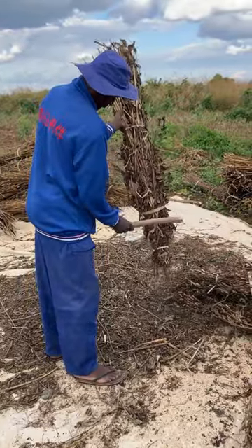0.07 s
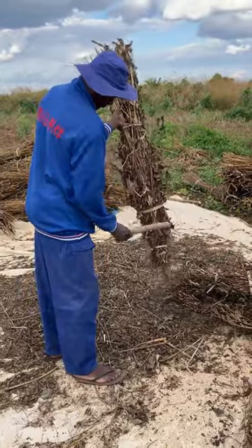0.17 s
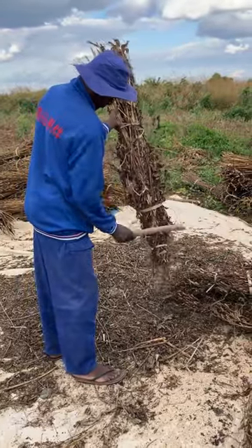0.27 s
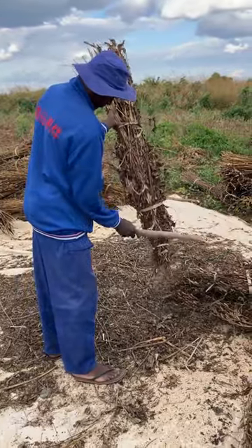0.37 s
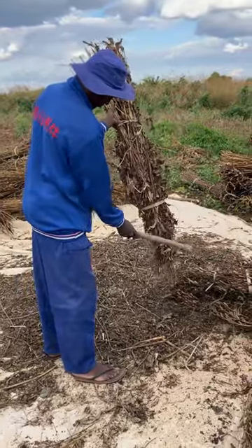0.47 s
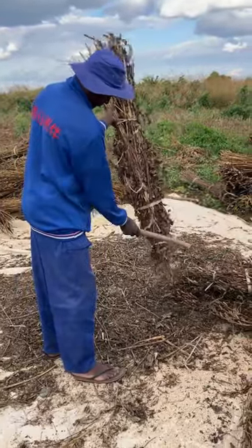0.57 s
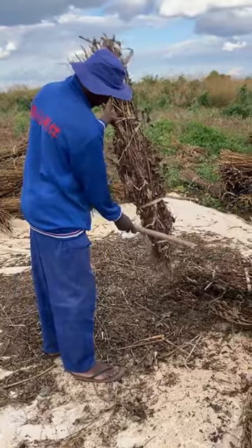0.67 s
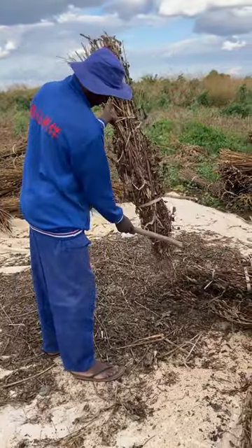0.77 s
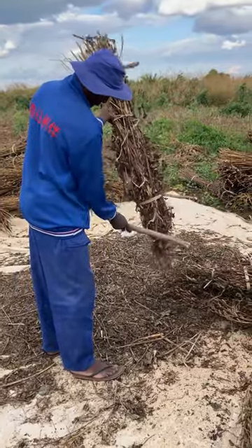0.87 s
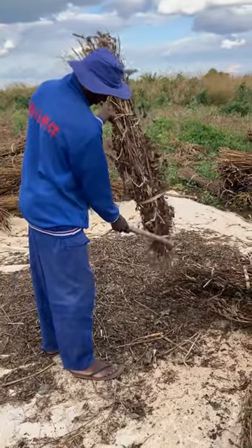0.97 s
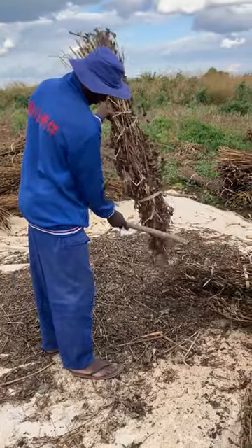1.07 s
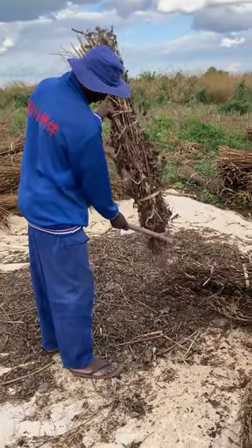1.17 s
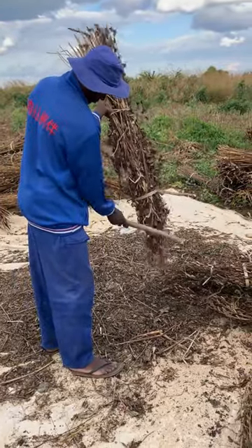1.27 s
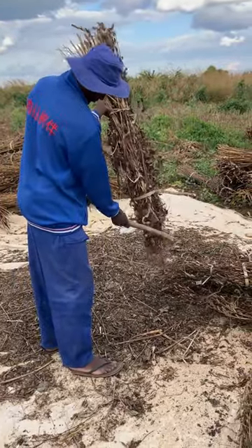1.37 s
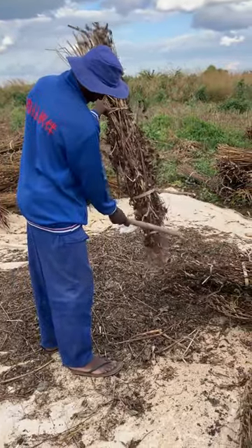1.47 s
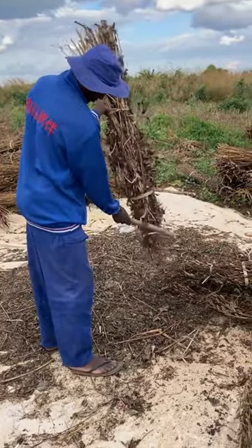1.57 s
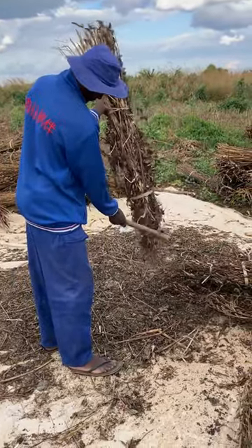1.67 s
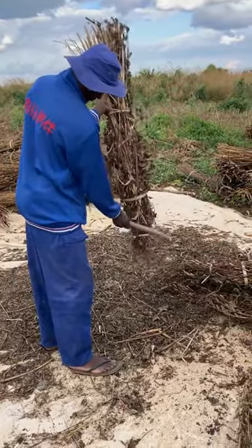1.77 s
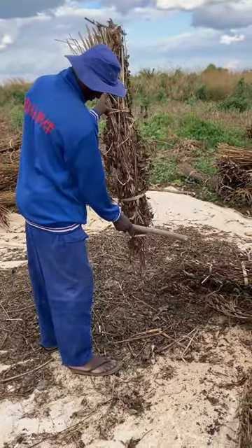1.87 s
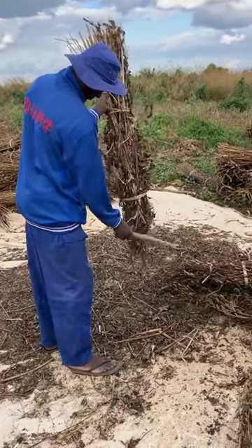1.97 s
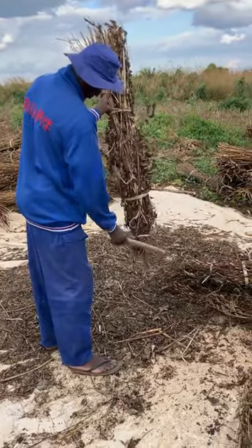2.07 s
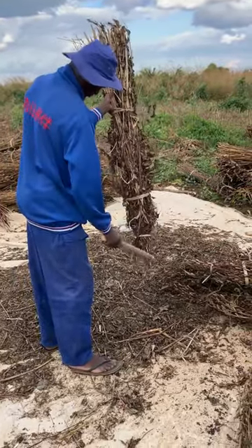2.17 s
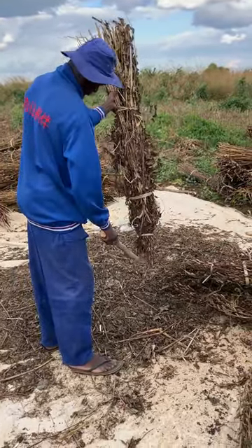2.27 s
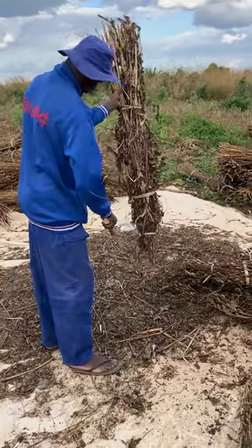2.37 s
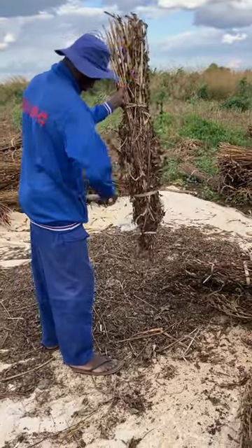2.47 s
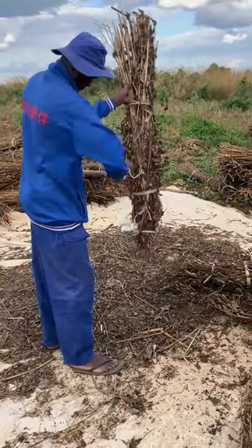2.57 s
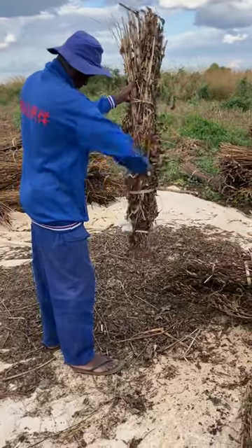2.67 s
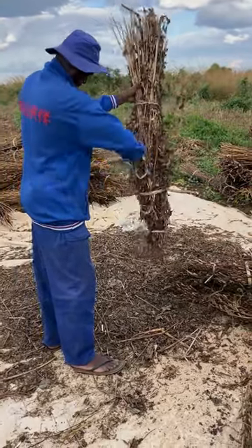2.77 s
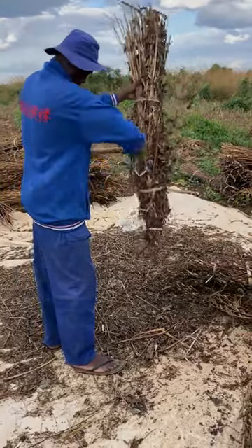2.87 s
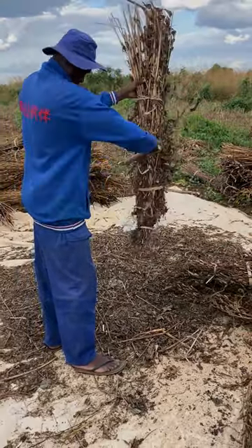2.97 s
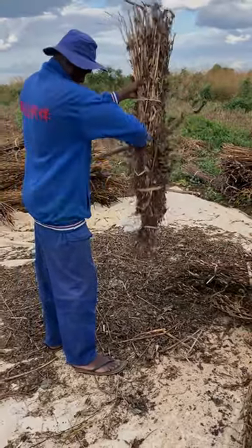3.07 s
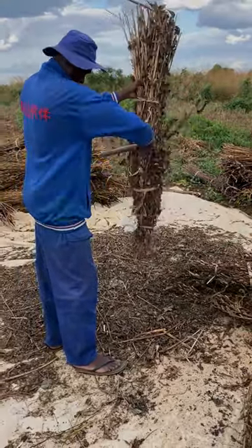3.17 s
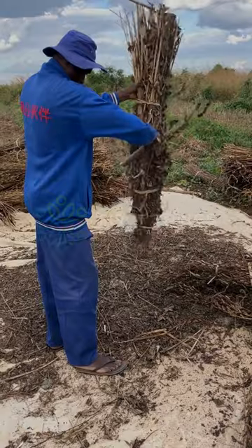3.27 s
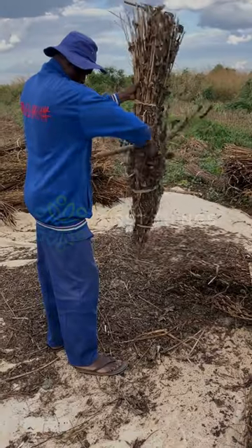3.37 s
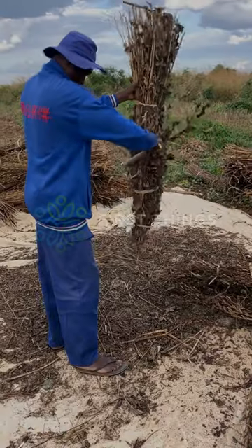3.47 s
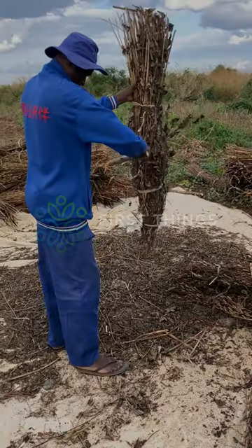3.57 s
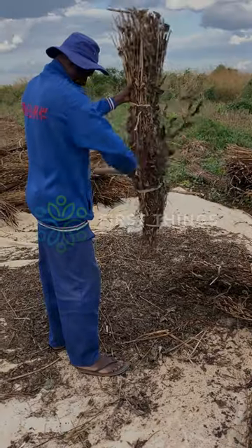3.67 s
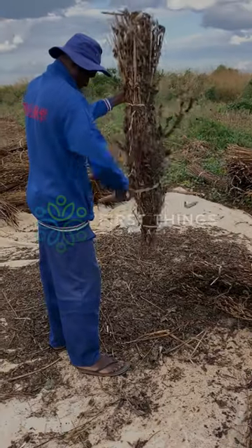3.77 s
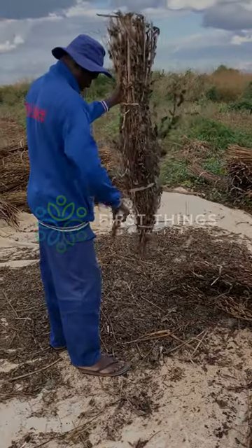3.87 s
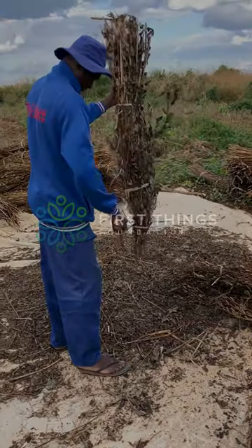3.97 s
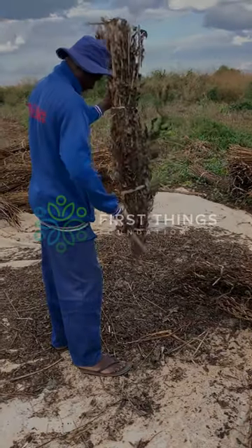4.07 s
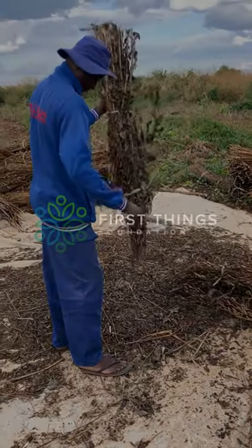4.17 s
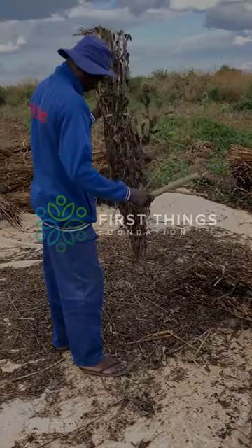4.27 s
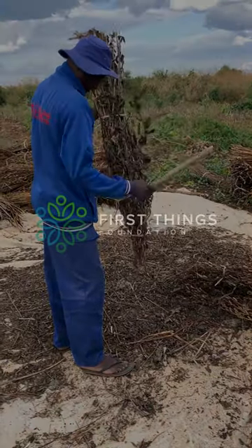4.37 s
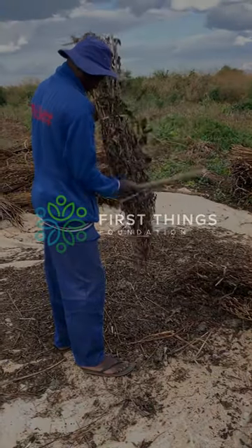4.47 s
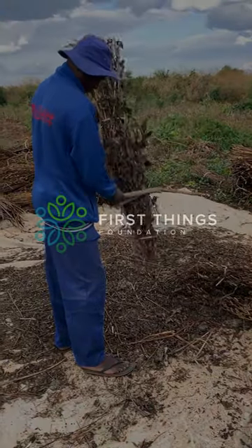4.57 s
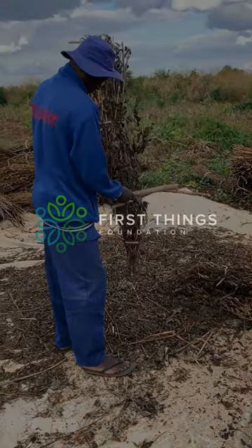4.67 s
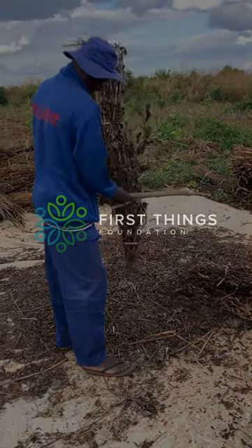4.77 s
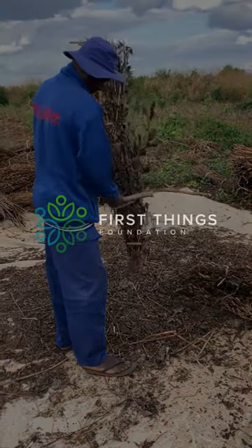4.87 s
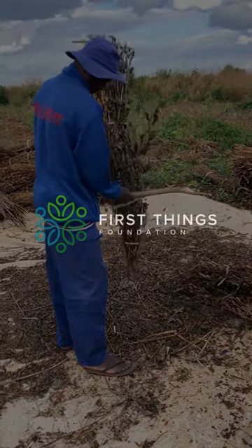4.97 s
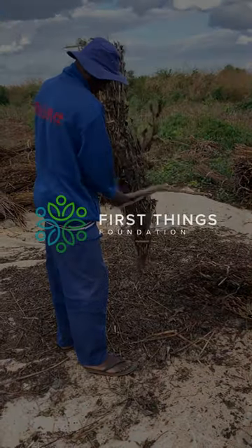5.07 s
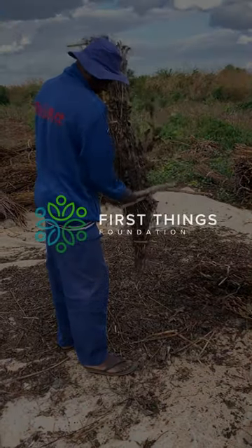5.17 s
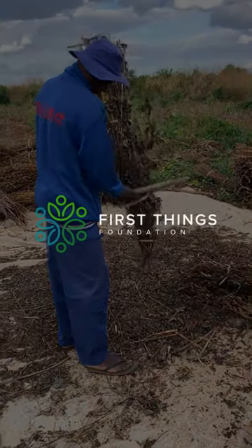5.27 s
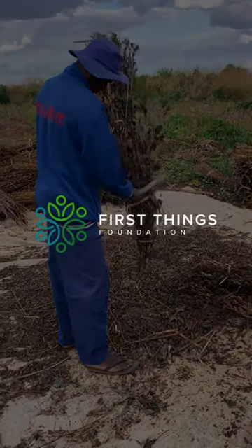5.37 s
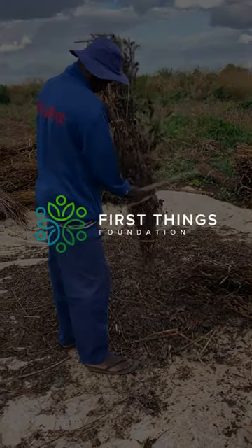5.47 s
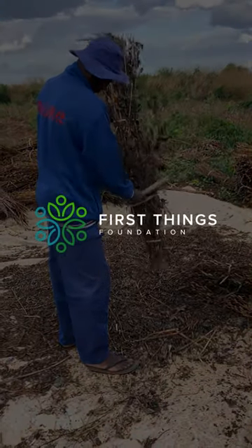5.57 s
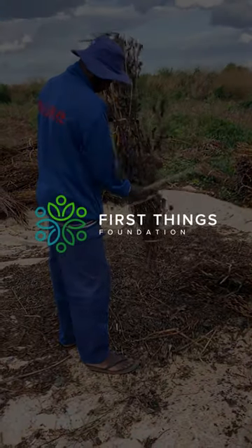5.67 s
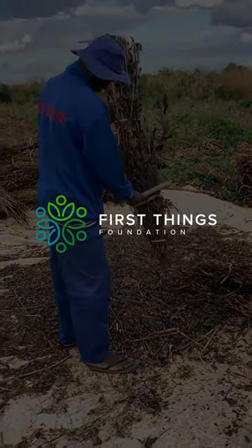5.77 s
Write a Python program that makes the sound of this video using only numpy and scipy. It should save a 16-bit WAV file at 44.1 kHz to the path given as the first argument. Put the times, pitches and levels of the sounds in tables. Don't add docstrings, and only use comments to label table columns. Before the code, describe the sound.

Outdoors, close to a hand-held stereo microphone, chaff and seeds patter finely before a stick beats a dry plant bundle seven times rapidly. Seeds trickle and twigs tick, then four blows with a stronger stalk rattle follow, a sparse pause, and six final blows, gradually softening. Light low wind puffs brush the microphone.

```python
import sys
import numpy as np
from scipy import signal
from scipy.fft import rfft, irfft, next_fast_len
from scipy.io import wavfile
from scipy.ndimage import uniform_filter1d

SR = 44100
rng = np.random.default_rng(int(sys.argv[2]) if len(sys.argv) > 2 else 0)


def natural_amplitude(level_db):
    exponent = np.asarray(level_db, float) / 20
    return 10 ** exponent


def output_pcm(signal):
    pcm = np.clip(np.atleast_2d(signal).T, -1, 1) * 32767
    wavfile.write(sys.argv[1], SR, np.round(pcm).astype(np.int16))


N = 256220

# start_s, peak_db, t60_s
GUSTS = [(.03, -76, 0.44), (.27, -64.5, 0.25), (.47, -74, 1.4), (.73, -65.5, 2.5), (.99, -60, 0.43),
         (1.16, -64, 0.23), (1.34, -81, 0.21), (1.54, -69, 0.17), (1.72, -54, 0.12), (2.01, -47.5, 0.23),
         (2.06, -70, 0.71), (2.26, -55, 0.22), (2.41, -54, 0.16), (2.67, -56.5, 0.43), (2.752, -39, 0.063),
         (2.85, -53, 0.11), (2.96, -73, 0.72), (3.12, -58, .3), (3.23, -61, 0.19), (3.38, -67, 0.19),
         (3.55, -67, 0.23), (3.67, -61.5, 0.24), (3.81, -76, 0.17), (4.45, -80, 0.46), (4.58, -67, 0.37),
         (4.871, -56, 0.17), (5.132, -40, 0.076), (5.36, -58, 0.2), (5.58, -54.5, 0.1), (5.79, -60, 0.26)]
# time_s, level_db
BREEZE = [(0, -80), (1.1, -79), (1.3, -102), (1.9, -94), (2.0, -60), (3.75, -70), (3.9, -89), (4.4, -69.5),
          (5.0, -85), (5.81, -90)]
# freq_hz, density_db
WIND_COLOUR = [(20, 0), (60, 6.5), (110, -2.5), (200, -16.5), (400, -62), (900, -89)]

# time_s, patter_db
SHOWER = [(0.0, -38.5), (0.29, -43), (0.6, -40.5), (1.37, -37.5), (1.86, -42.5), (2.48, -47), (2.68, -46),
          (3.38, -46.5), (3.61, -47), (3.88, -45), (4.27, -51.5), (4.53, -55.5), (5.1, -54.5), (5.81, -51)]
# start_s, peak_db
TICKS = [(0.0474, -27), (0.0714, -28), (0.1464, -27), (0.2164, -27), (0.4034, -26), (2.0438, -28),
         (2.1364, -32), (2.1755, -28), (2.2528, -33), (2.3544, -30), (2.3604, -30), (2.4199, -23),
         (2.5486, -31), (2.6599, -25), (3.8024, -32), (3.8124, -32), (3.8681, -32), (3.906, -28),
         (3.9394, -34), (3.9843, -25), (4.0494, -36), (4.1114, -31), (4.1644, -32), (4.2794, -34),
         (4.3056, -37), (4.3894, -36), (4.4448, -39), (4.4762, -40), (4.4994, -40), (4.5151, -28.5)]
# freq_hz, density_db
PATTER_COLOUR = [(90, -63), (250, -19.5), (560, -29.5), (800, -22), (1200, -17), (3400, -14.5),
                 (5500, -5.5), (9000, -3.5), (11700, 2.5), (15600, -6.5)]
# time_s, share (0-1)
NARROW_FALL = [(0, .1), (1.3, .15), (1.5, .35), (2.4, .3), (2.6, .9), (3.3, .9), (3.7, .7), (3.9, .3),
               (5.81, .5)]
# freq_hz, density_db
CREAK_COLOUR = [(300, -16), (560, -19), (1000, -9.5), (2000, 1), (4000, -9), (6000, -5), (9000, -31)]

# start_s, crash_peak_db, knock_db, stem_pitch_hz, thud_db
BLOWS = [(0.505, -10.5, -28.5, 1980, -58.5), (0.7242, -10, -23.5, 1520, -52),
         (0.9341, -9, -27.5, 1800, -67), (1.1426, -11.5, -27.5, 2170, -59.5),
         (1.3368, -10, -28.5, 1350, -59), (1.528, -11, -44, 1310, -64), (1.706, -10, -25.5, 2040, -76),
         (2.7084, -11.5, -22, 1710, -55.5), (2.9747, -11.5, -25, 1460, -53),
         (3.217, -13.5, -26, 1330, -55.5), (3.4346, -15.5, -27, 1300, -59),
         (4.569, -11.5, -22.5, 1740, -57), (4.8622, -13, -23, 1780, -58.5), (5.117, -13, -19, 2270, -55),
         (5.3442, -14, -28, 1850, -59), (5.569, -16, -27.5, 1740, -54.5), (5.7832, -18.5, -29, 2120, -64)]
RUN_STARTS_S = [0, 2.5, 4.3]
# rattle_db, rebound_db, crash_t60_s, graze_db, twig_hz
RUNS = [
    (-9, -12.5, 0.11, -24, 8700),
    (-5.5, -12.5, 0.13, -22, 2300),
    (-13, -10, 0.1, -23.5, 2900),
]
# start_s, level_db, twig_hz
TWIG_GRAZES = [
    (0.705, -35.5, 1320),
    (0.922, -29, 3000),
    (1.326, -31, 3280),
    (2.957, -45, 1220),
]
# start_s, peak_db
BUMPS = [
    (0.202, -74),
    (0.872, -39.5),
    (1.079, -48),
    (1.866, -64),
    (1.951, -55),
    (2.799, -56),
    (3.299, -51),
    (3.619, -52.5),
    (3.968, -56.5),
    (4.349, -82),
]
# pitch_ratio, level_db
STALKS = [(.7, 2), (1.01, 7.5), (1.36, 5.5), (1.9, -4.5)]
# freq_hz, density_db
CRASH_COLOUR = [(120, -71), (300, -40), (560, -42), (800, -15), (1200, -8), (2400, -7.5), (4500, -2),
                (7500, -0.5), (10300, 4), (13000, 2), (15600, -4)]
# freq_hz, density_db
RATTLE_COLOUR = [(90, -77), (250, -5.5), (560, -12), (800, -12), (1200, -0.5), (3400, -1.5), (5500, -0.5),
                 (10300, 5), (13000, 1.5), (15600, 0)]
# freq_hz, density_db
TWANG_COLOUR = [(200, -19.5), (400, -11), (560, -22), (900, -5), (1700, -17.5), (3500, -14), (6000, 5),
                (9000, -21)]

# freq_hz, likeness (0-1)
LIKENESS = [(200, .7), (600, .4), (1500, .75), (2400, .2), (4500, .3), (5200, .93), (6000, .96),
            (6700, .72), (8500, .99), (10000, .82), (11200, .995), (12250, .995), (12600, .35), (14000, .6),
            (15000, .9)]
# freq_hz, boost_db
LEFT_BOOST = [(330, 4.5), (500, 6), (800, 15.5), (1100, 5.5), (2000, 5.5)]
# freq_hz, phase_turns
PORT_TURNS = [(0, 1), (350, 1.02), (560, 1.25), (1000, 1.16), (1900, 1), (3000, 1.2), (4200, .65),
              (5100, .5), (6000, .47), (8100, .01), (8800, 0), (11300, -.49), (12300, -.51), (14600, -1),
              (22050, -1)]

GUST_RISE_S, GUST_LEAD_S = 0.0083, 0.017
FLUTTER_DB = -8
DULL_DB, DULL_DB_PER_DB = 3.5, -0.19
CHAFF_DB, CHAFF_START_DB, CHAFF_END_S = -3, 5, 0.405
CREAK_DB = -18.5
GRAZE_LEAD_S, KNOCK_LAG_S = 0.0087, 0.002
APPROACH_S, APPROACH_DB = 0.03, -12
BOUNCE_S, TWANG_DB = 0.017, -26
RATTLE_T60_S, KNOCK_T60_S, THUD_T60_S = 0.74, 0.14, 0.22
THUD_HZ, THUD_WIDTH_HZ = 272, 260
CUTOFF_HZ = 15850
TURN_AT_S, TURN_LASTS_S, TURN_DB = 5.2, 0.14, 2


def rms_one(x):
    return x / np.sqrt(np.mean(x ** 2) + 1e-20)


def in_time(rows):
    s, *columns = np.transpose(rows)
    return [np.interp(np.arange(N) / SR, s, c) for c in columns]


def at_hz(points, hz):
    table = np.array(points)
    return np.interp(np.log(hz + 1), np.log(table[:, 0]), table[:, 1])


def by_run(times):
    return np.array(RUNS)[np.searchsorted(RUN_STARTS_S, times) - 1].T


def colour(x, spectrum):
    size = next_fast_len(N)
    gain = natural_amplitude(at_hz(spectrum, np.fft.rfftfreq(size, 1 / SR)))
    return rms_one(irfft(rfft(x, size) * gain, size)[..., :N])


def drift(rate_hz):
    r = np.exp(-64 * np.pi * rate_hz / SR)
    steps = rng.standard_normal(N // 32 + 1002)
    slow = signal.lfilter([1], [1, -2 * r, r * r], steps)[1000:]
    return np.interp(np.arange(N) / 32, np.arange(len(slow)), rms_one(slow))


def resonate(x, hz, width_hz):
    r = np.exp(-np.pi * width_hz / SR)
    b = np.array([1, 0, -1]) * (1 - r * r) / 2
    return signal.lfilter(b, [1, -2 * r * np.cos(2 * np.pi * hz / SR), r * r], x)


def swell(times, level_db, t60_s, rise_s, lead_s):
    power = np.zeros(N)
    for s, db, fall_s in np.broadcast(times, level_db, t60_s):
        a = min(int((s - lead_s) * SR), N)
        age_s = np.arange(min(int(fall_s * SR), N - a)) / SR
        rise = 1 - np.exp(-(age_s / rise_s) ** 2)
        power[a:a + len(age_s)] += (natural_amplitude(db - 60 * age_s / fall_s) * rise) ** 2
    return np.sqrt(power)


def grains(per_s, spread_db, clump_db):
    size_db = spread_db * np.minimum(rng.exponential(1, N), 5) + clump_db * drift(250)
    sizes = natural_amplitude(size_db) * (rng.random(N) < per_s / SR)
    return rms_one(sizes * rng.choice([-1, 1], (2, N)))


def crackle(per_s, spread_db, clump_db, patch_db, cycles, spectrum, top_hz):
    clicks = grains(per_s, spread_db, clump_db)
    pitches_hz = np.geomspace(top_hz / 40, top_hz, 12)
    shares = np.sqrt(pitches_hz)
    dealt = np.searchsorted(np.cumsum(shares) / shares.sum(), rng.random(N))
    total = np.zeros((2, N))
    for k, hz in enumerate(pitches_hz):
        patches = natural_amplitude(patch_db * (1.1 * drift(6) + 0.62 * drift(45)))
        ring = resonate(clicks * ((dealt == k) * patches) + 1e-18, hz, hz / cycles)
        total += rms_one(ring) * np.sqrt(hz)
    return colour(total, spectrum)


def wind():
    eddies = colour(rng.standard_normal((2, N)), WIND_COLOUR)
    eddies = eddies / uniform_filter1d(eddies ** 2, size=1100) ** 0.25
    flutter = rms_one(resonate(eddies, 140, 180))
    s, db, t60_s = np.transpose(GUSTS)
    strength = swell(s, db + 6.5, t60_s, GUST_RISE_S, np.minimum(GUST_LEAD_S, s.min()))
    strength = strength + natural_amplitude(in_time(BREEZE)[0])
    a, b = eddies + natural_amplitude(FLUTTER_DB) * np.sqrt(strength / natural_amplitude(-57)) * flutter
    return strength * natural_amplitude(0.28 * drift(5.0)) * np.array([0.67 * a + 1.15 * b, 0.8 * a - 0.93 * b])


def ticks():
    out = np.zeros((2, N))
    for (s, db), shape in zip(TICKS, rng.standard_normal((len(TICKS), 2, 40))):
        a = int(s * SR)
        out[:, a:a + 40] += natural_amplitude(db + 3) * np.sign(shape) * np.exp(-np.arange(40) / 22)
    return signal.sosfilt(signal.butter(3, 5500, "high", fs=SR, output="sos"), out)


def seeds():
    patter_db, = in_time(SHOWER)
    dull_db = DULL_DB + DULL_DB_PER_DB * (patter_db + 56.5)
    fine_db = np.where(np.arange(N) / SR < CHAFF_END_S, CHAFF_START_DB, CHAFF_DB)
    patter = crackle(16000, 1.5, 0.6, 2.2, 3.2, PATTER_COLOUR, top_hz=15000)
    dull = signal.sosfilt(signal.butter(1, 4000, fs=SR, output="sos"), patter)
    fine = resonate(patter, 12600, 2200)
    shower = patter + (natural_amplitude(dull_db) - 1) * dull + (natural_amplitude(fine_db) - 1) * fine
    return natural_amplitude(patter_db + 5) * shower + ticks()


def creaks():
    rubbing = crackle(1500, 2.9, 0.7, 2.97, 14.4, CREAK_COLOUR, top_hz=6230)
    return natural_amplitude(in_time(SHOWER)[0] + CREAK_DB) * rubbing


def brushes():
    out, scratch = np.zeros((2, N)), grains(9000, 3.07, 1.0)
    hit_s, peak_db = np.transpose(BLOWS)[:2]
    *_, graze_db, twig_hz = by_run(hit_s)
    grazes = zip(hit_s - GRAZE_LEAD_S, peak_db + graze_db, twig_hz)
    for s, db, hz in [*grazes, *TWIG_GRAZES]:
        part = slice(int(s * SR), int(s * SR) + 2000)
        touch = (swell(s, db, 0.078, 0.0038, 0) * scratch)[:, part]
        out[:, part] += natural_amplitude(12.5) * resonate(touch, hz, hz) + natural_amplitude(3.5) * np.diff(touch, prepend=0)
    return out


def knocks():
    out, contacts = np.zeros((2, N)), grains(2500, 0.9, 0.8)
    for s, _, db, stem_hz, _ in BLOWS:
        part = slice(int(s * SR) - 100, int(s * SR) + 6000)
        touch = (swell(s + KNOCK_LAG_S, db - 7, KNOCK_T60_S, 0.0036, 0.0022) * contacts)[:, part]
        for ratio, level_db in STALKS:
            hz = ratio * stem_hz
            out[:, part] += natural_amplitude(level_db + 9.0) * resonate(touch, hz, 0.17 * hz)
    return out


def thuds():
    s, _, _, _, thud_db = np.transpose(BLOWS)
    bump_s, bump_db = np.transpose(BUMPS)
    weight = swell(s, thud_db - 3.0, THUD_T60_S, 0.0035, 0.00086)
    weight = weight + swell(bump_s, bump_db - 23, 0.38, 0.0071, 0.011)
    push = weight * rng.standard_normal((2, N))
    body = resonate(resonate(push, THUD_HZ, THUD_WIDTH_HZ), THUD_HZ, THUD_WIDTH_HZ)
    return natural_amplitude(28.5) * (body + resonate(push, 181, 125))


def rattles():
    s, peak_db = np.transpose(BLOWS)[:2]
    rattle_db = by_run(s)[0]
    rattle = swell(s, peak_db + rattle_db - 8.5, RATTLE_T60_S, 0.017, 0.002)
    rattle = rattle * crackle(14000, 1.0, 0.3, 3.3, 0.48, RATTLE_COLOUR, top_hz=13100)
    twang = swell(s, peak_db + TWANG_DB, 0.61, 0.0058, 0.0012)
    twang = twang * crackle(3000, 1.5, 0.98, 3.4, 9.1, TWANG_COLOUR, top_hz=6530)
    return rattle + twang


def crashes():
    s, peak_db = np.transpose(BLOWS)[:2]
    _, bounce_db, crash_t60_s, _, _ = by_run(s)
    approach = swell(s, peak_db + APPROACH_DB, 0.16, 0.031, APPROACH_S)
    impact = swell(s, peak_db - 3, crash_t60_s, 0.0039, 0.0034)
    rebound = swell(s, peak_db + bounce_db, crash_t60_s, 0.014, -BOUNCE_S)
    pods = crackle(25000, 2.4, 1.0, 1.55, 4.1, CRASH_COLOUR, top_hz=15360)
    return np.hypot(impact, rebound + approach) * pods


def ports(pair, scatter):
    size = next_fast_len(N)
    hz = np.fft.rfftfreq(size, 1 / SR)
    shared, own = rfft(pair, size)
    alike = at_hz(LIKENESS, hz) ** np.where((hz > 5000) & (hz < 8000), scatter, 1)
    turn = np.exp(2j * np.pi * np.interp(hz, *np.transpose(PORT_TURNS)))
    boost = natural_amplitude(at_hz(LEFT_BOOST, hz) / 2)
    right = alike * turn * shared + np.sqrt(1 - alike ** 2) * own
    return irfft([shared * boost, right / boost], size)[:, :N]


def scene():
    gusts, shower = wind(), seeds()
    narrow = in_time(NARROW_FALL)[0]
    air = narrow * ports(shower, scatter=1.0) + (1 - narrow) * ports(shower, scatter=13.0)
    air = air + ports(creaks() + brushes() + knocks() + thuds() + rattles(), scatter=0.93)
    air = air + ports(crashes(), scatter=6.6)
    turn = np.exp(-((np.arange(N) / SR - TURN_AT_S) / TURN_LASTS_S) ** 2)
    aim_db = -LEFT_BOOST[-1][1] + TURN_DB * turn
    return air * natural_amplitude(np.outer([0.5, -0.5], aim_db)) + gusts


def top_cut(x):
    return signal.sosfilt(signal.butter(12, 17000, fs=SR, output="sos"), x)


def record(dry):
    cut = signal.sosfilt(signal.ellip(12, 0.3, 70, CUTOFF_HZ, fs=SR, output="sos"), dry)
    cut = signal.sosfilt(signal.butter(2, 42, "high", fs=SR, output="sos"), cut)
    return top_cut(cut)


dry = scene()
out = record(dry)
output_pcm(out)
```